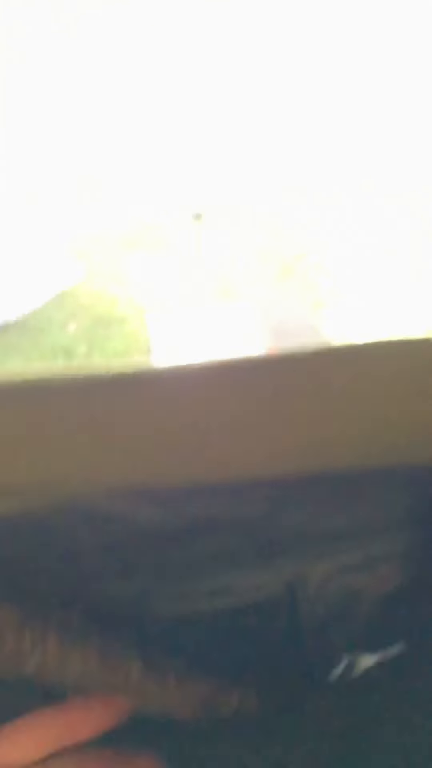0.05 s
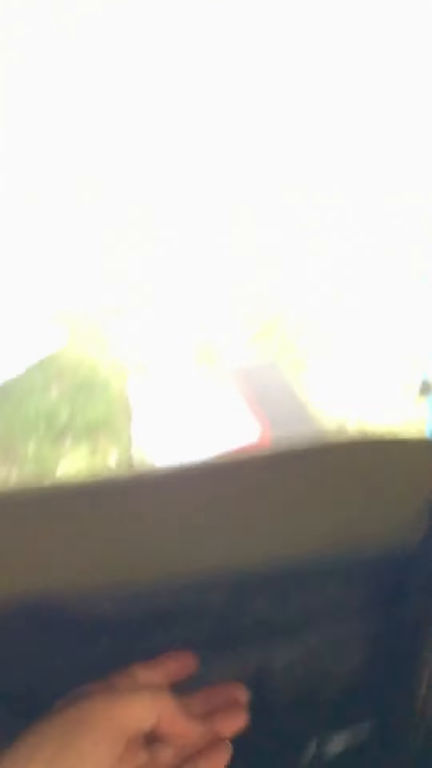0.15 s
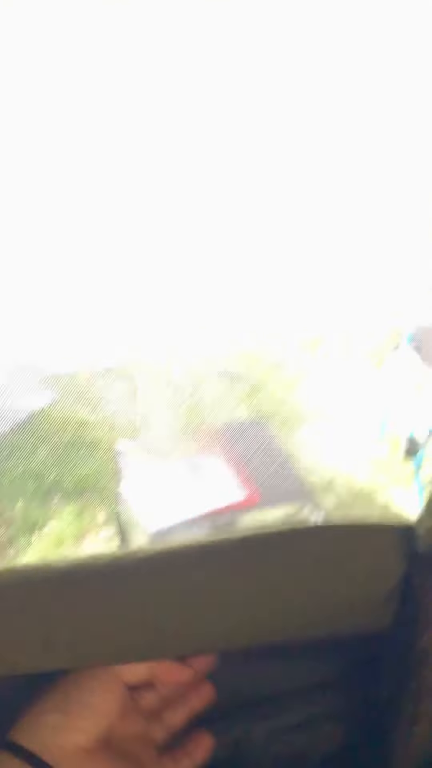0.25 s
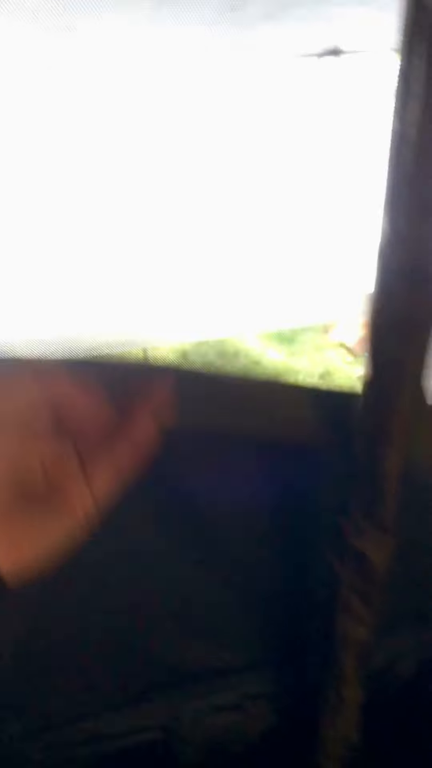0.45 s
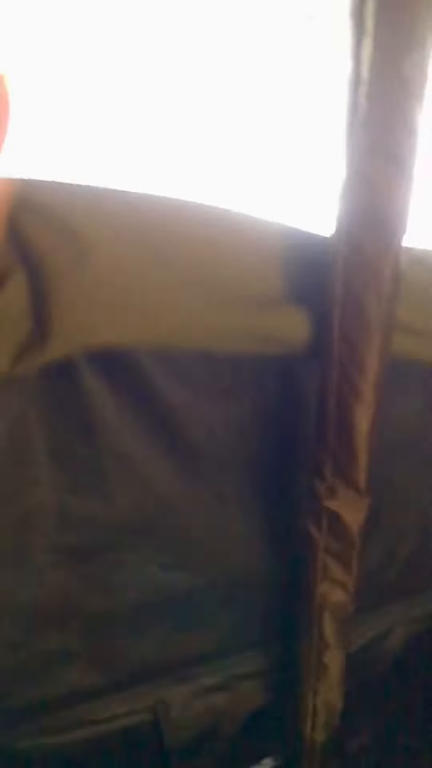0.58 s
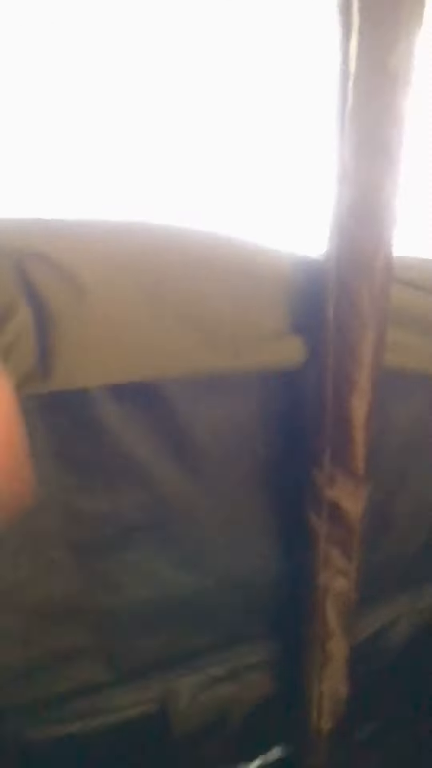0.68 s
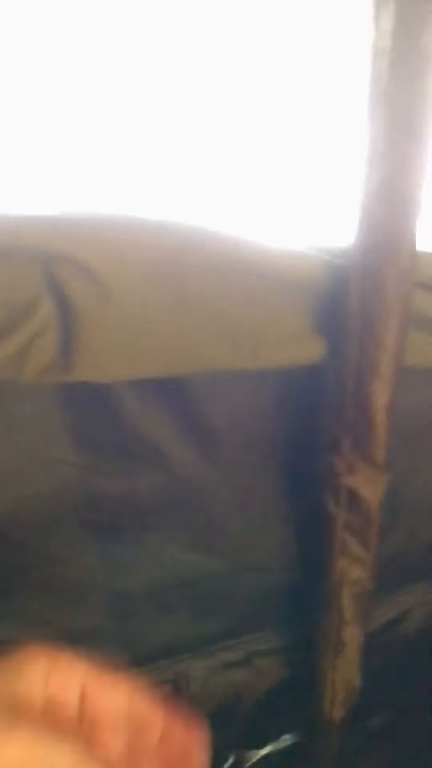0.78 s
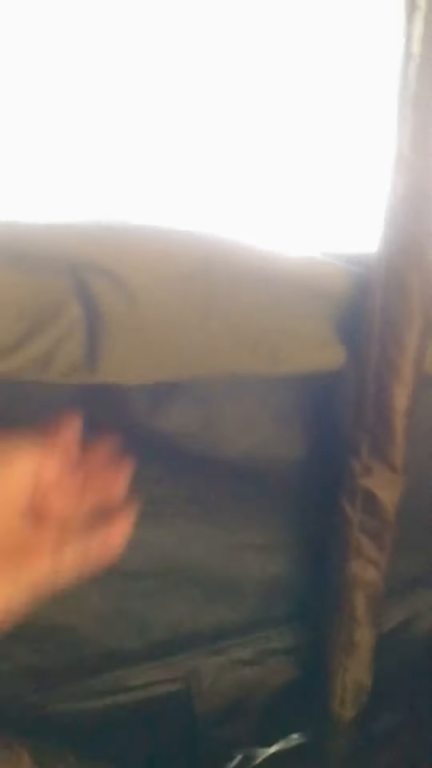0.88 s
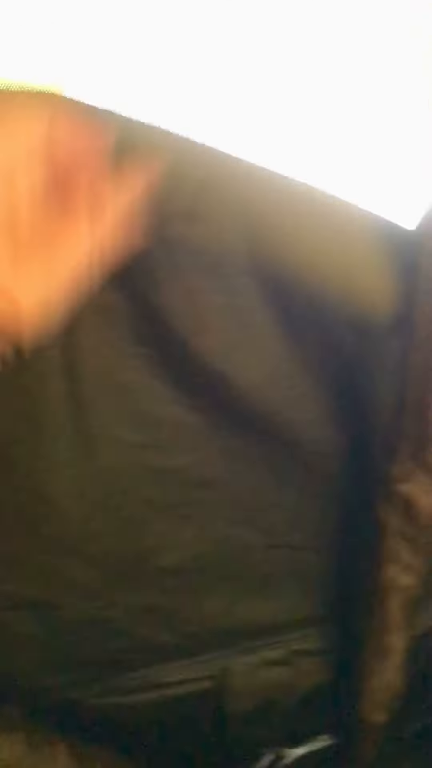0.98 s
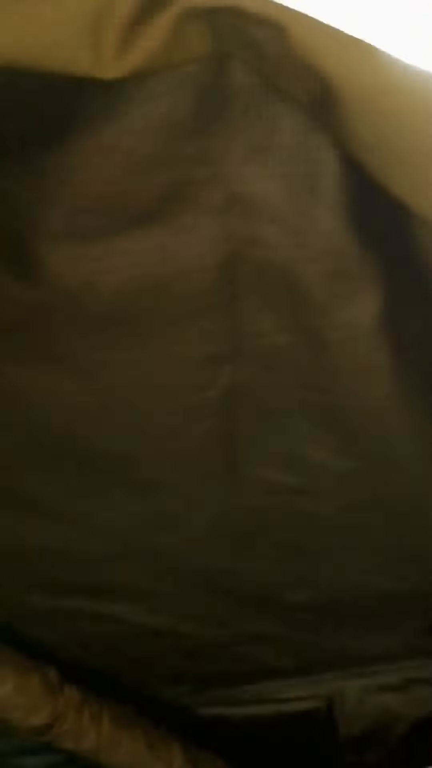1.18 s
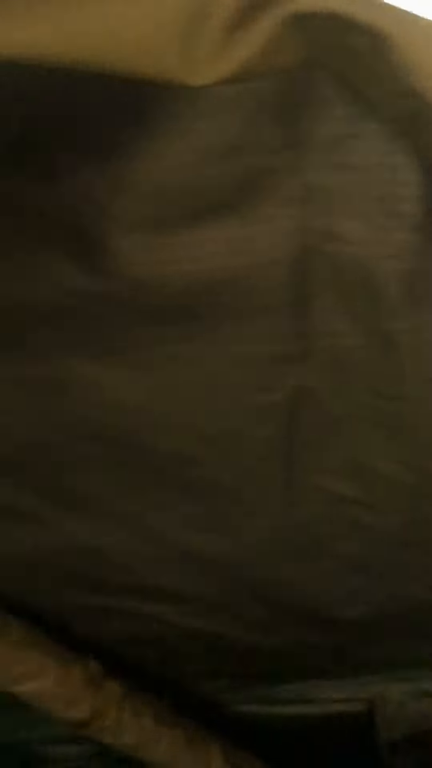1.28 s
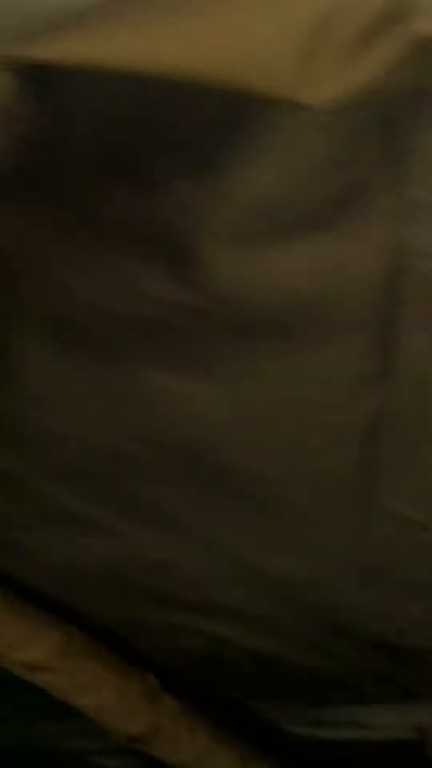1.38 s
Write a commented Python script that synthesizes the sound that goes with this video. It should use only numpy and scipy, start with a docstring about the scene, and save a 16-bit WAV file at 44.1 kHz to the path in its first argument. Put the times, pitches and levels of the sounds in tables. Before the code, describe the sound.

A zipper closes a tent window in two quick pulls, with rustling fabric.

```python
"""A bright, close zip in two quick pulls: a tent window is being shut.
Fine coil teeth run together into a hiss while the slider catches, ticks and at the end squeaks faintly.
The cloth rustles, crumples and snaps taut; the wall sways and flaps like a slack drum.
Ticks and snaps reflect briefly off the tent walls, and faint outdoor air lies under it all."""
import sys
import numpy as np
from scipy import signal
from scipy.io import wavfile
from scipy.ndimage import uniform_filter1d

SR = 44100
rng = np.random.default_rng(int(sys.argv[2]) if len(sys.argv) > 2 else 0)


def generate_wav(sig):
    """Save sig (samples, or channels by samples) to the path in sys.argv[1] as 16-bit PCM at SR."""
    pcm = np.round(np.clip(np.atleast_2d(sig).T, -1, 1) * 32767).astype(np.int16)
    wavfile.write(sys.argv[1], SR, pcm)


N = 63945
TIME = np.arange(N) / SR

# the two pulls (time [s], relative hiss level [dB], treble lift [dB], relative rustle level [dB])
PULL_LEVELS = [(0.085,-64.5,0,-62.5),(0.118,-41.5,-2.5,-45),(0.155,-36.5,0,-53.5),(0.195,-39.5,-7,-40),(0.235,-29.5,-1.5,-41.5),(0.30,-30.5,-1,-36),(0.355,-29,4.5,-31),(0.372,-25.5,4,-28),(0.39,-27.5,2,-34.5),(0.405,-26,2,-27),(0.435,-28.5,-11,-35),(0.468,-44,-0.5,-45),(0.55,-45,-2,-49),(0.61,-46.5,2,-48),(0.67,-54.5,-2,-51),(0.715,-63.5,2,-57),(0.747,-63,3,-58.5),
               (0.752,-41.5,7,-59),(0.775,-32,4.5,-43.5),(0.81,-27,0.5,-43),(0.865,-29,0,-34),(0.895,-24.5,-3.5,-29),(0.92,-26,-7.5,-30.5),(0.945,-31,1,-35),(0.985,-31.5,2,-41.5),(1.008,-28.5,1.5,-40),(1.02,-38.5,-1,-48),(1.085,-40,-2.5,-47.5),(1.15,-48.5,-0.5,-53),(1.23,-54,2,-56.5),(1.30,-58.5,-2,-54.5),(1.35,-56,-2,-59),(1.37,-53.5,-3,-50),(1.397,-44,1,-51),(1.42,-49,1,-54.5),(1.45,-52,-1,-58)]
# tone of the slider on its tape (frequency [Hz], gain [dB])
HISS_EQ = [(300,-25.5),(1200,-15),(2500,-7),(3800,-6.5),(4900,-4),(5900,-2),(7500,-6.5),(9400,-2.5),(10800,-1.5),(12200,1.7),(14000,2),(15800,-2)]
# the slider catches (time [s], level before the low cut [dB], decay [s], low cut [Hz])
SLIDER_CATCHES = [(0.095,-35,0.00045,3000),(0.367,-22,0.00036,8000),(0.379,-13,.0008,10000),(0.3824,-11,.0005,10000),(0.3969,-18,.0007,7100),(0.406,-12,0.00046,8000),(0.4159,-3,0.00068,11300),(0.4248,-13.5,0.003,6150),(0.4284,-5.5,0.0011,7900),(0.4301,-2.5,0.001,6240),(0.9661,-16,0.0034,5170),(0.9694,-9.5,0.00052,4400),(1.013,-20,0.0012,3000),(1.355,-38,0.0015,2500)]
# the slider squeaks (time [s], length [s], level [dB])
SLIDER_SQUEAKS = [(1.372,0.032,-40),(1.427,0.026,-49)]
# modes that ring in a squeak (frequency [Hz], gain [dB])
SLIDER_MODES = [(5200,-11),(8683,-13),(12102,0.5)]
# the cloth snaps taut (time [s], finished snap's rms over 10 ms [dB], pitch [Hz], Q, crackle decay [s])
CLOTH_SNAPS = [(0.161,-47,816,1.9,0.0027),(0.326,-29.5,566,0.46,0.00076),(0.396,-31,810,1.5,0.0058),(0.4315,-28.5,980,1.8,0.0047),(0.4311,-28,2360,7.9,0.0014),(0.4887,-51,700,.8,0.0022),(0.5886,-39.5,970,2,0.0047),(0.7493,-43,644,0.75,0.001),(0.7535,-36.5,694,0.5,0.0046),(0.8349,-36,540,0.69,0.0054),(0.882,-21.5,1110,0.97,0.0023),(0.887,-34,1190,1.5,0.0023),(0.895,-37.5,1530,3.5,0.0024),(0.8965,-22.5,1160,2,0.0079),(0.9692,-31.5,2480,1.2,0.0035),(1.013,-36,920,1.5,0.0019),(1.0117,-33.5,2400,1.2,0.0015),(1.355,-52,1430,0.85,0.0026),(1.362,-49.5,1740,5.2,0.0058),(1.376,-54,1110,0.62,0.0048)]
# tone of a snap (frequency [Hz], gain [dB])
SNAP_EQ = [(60,-4),(250,7.5),(450,-2),(800,5),(1300,3.5),(2000,-3),(3500,-4.5),(7000,-2),(16000,-44)]
# tone of the rustling fabric (frequency [Hz], gain [dB])
RUSTLE_EQ = [(100,-6),(200,-7),(330,-18.5),(550,-9.5),(850,-1),(1200,-1.5),(1700,-3),(2500,-3),(4500,-10),(10000,-15.5)]
# low crumpling of the slack folds (time [s], level [dB])
FOLD_LEVELS = [(0.15,-64.5),(0.27,-56),(0.40,-55),(0.49,-52),(0.53,-55.5),(0.62,-57),(0.72,-71),(0.80,-49.5),(0.88,-54),(1.0,-79.5)]
# tone of the folds (frequency [Hz], gain [dB])
FOLD_EQ = [(150,-26),(300,-1),(430,-1),(580,-1),(900,-22),(2000,-53)]
# swaying of the wall (time [s], level [dB])
SWAY_LEVELS = [(0.07,-70),(0.115,-49),(0.19,-54),(0.28,-48.5),(0.37,-40),(0.425,-36),(0.47,-43.5),(0.56,-57),(0.74,-59.5),(0.79,-38),(0.85,-38),(0.90,-38),(0.95,-44.5),(1.05,-52),(1.15,-58.5),(1.33,-58.5),(1.385,-45.5),(1.45,-59.5)]
# tone of the sway (frequency [Hz], gain [dB])
SWAY_EQ = [(20,-5.5),(50,1.5),(90,-2),(170,-6),(280,-18),(600,-23.5),(2000,-87)]
# the wall flaps (time [s], strength [dB], resting pitch [Hz], decay [s])
WALL_FLAPS = [(0.097,-37.5,93,0.0067),(0.409,-28,52.6,0.03),(0.432,-35,74,0.031),(0.7565,-12,61,0.0098),(0.832,-31.5,103,0.019),(0.876,-25.5,87.4,0.022),(1.2068,-32.5,85,0.0088),(1.222,-30.5,56.4,0.022)]
# tone of the outdoor air (frequency [Hz], gain [dB])
AIR_EQ = [(20,-12),(80,9.5),(300,3),(600,-5.5),(1500,-4.5),(2200,1.5),(3300,-10.5),(4900,-9),(6000,-10.5),(10000,-4.5),(12500,-2.5),(16000,-6.5)]
# dips in the microphone's response (frequency [Hz], width [Hz], gain [dB])
MIC_NOTCHES = [(4864,550,-6),(10530,330,-5.5)]


def zipper():
    """Teeth mesh unevenly, faster on a harder pull, within the hiss of the slider on its tape."""
    full_teeth_per_s, full_pull_db, db_per_tenfold_speed = 1500, -24.5, 45.5
    teeth_db, hiss_db, treble_hz = -7.5, 2, 10800
    force = level(PULL_LEVELS)
    teeth_per_s = full_teeth_per_s * (force / amp(full_pull_db)) ** (20 / db_per_tenfold_speed)
    teeth_passed = np.cumsum(teeth_per_s * np.exp(.3 * wobble(60))) / SR
    clicks = np.diff(np.floor(teeth_passed), prepend=0)
    clicks *= amp(3.5 * rng.standard_normal(N))  # no two teeth equally loud
    drive = rng.standard_normal(N) + amp(teeth_db) * unit(clicks)
    hiss = patchy(colour(drive, HISS_EQ), depth_db=2, span_hz=1240, span_s=0.056)
    treble = signal.sosfiltfilt(signal.butter(6, treble_hz, "high", fs=SR, output="sos"), hiss)
    treble_gain = level(PULL_LEVELS, column=2)
    return amp(hiss_db) * force * (hiss + (treble_gain - 1) * treble)


def ticks():
    """The slider catches: each snag is a bright, dry clump of tiny slips."""
    out = np.zeros(N)
    for start, db, decay_s, low_cut_hz in SLIDER_CATCHES:
        add(out, start, amp(db) * highpass(burst(decay_s), low_cut_hz, order=4))
    return out


def squeaks():
    """Dragged slowly, the slider sings on its modes in thin, wavering tones."""
    out, waver_hz = np.zeros(N), 45.4
    for start, length, db in SLIDER_SQUEAKS:
        t = np.arange(0, length, 1 / SR)
        swell = np.sin(np.pi * t / length)
        for hz, mode_db in SLIDER_MODES:
            pitch = hz + waver_hz * wobble(130)[:len(t)]
            add(out, start, amp(db + mode_db) * swell * sine(pitch))
    return out


def snaps():
    """Slack cloth is jerked tight: one jolt and a crackle ring a heavily damped patch of fabric."""
    out, crackle_db = np.zeros(N), -16
    for start, db, hz, q, decay_s in CLOTH_SNAPS:
        drive = amp(crackle_db) * burst(decay_s)
        drive[0] += 1  # the jolt
        pop = colour(resonate(drive, hz, q), SNAP_EQ)
        pop *= np.sqrt(.01 * SR) / np.linalg.norm(pop)  # the energy of 10 ms at unit rms
        add(out, start, amp(db) * pop)
    return out


def cloth():
    """Dense crinkles drive the fabric's rustle and its crumpling folds, over the low sway of the wall."""
    crinkles_per_s, rustle_db = 1500, 0.5
    crinkles = rng.standard_normal(N) * (rng.random(N) < crinkles_per_s / SR)
    drive = unit(crinkles) + 1.27 * rng.standard_normal(N)
    rustle = patchy(colour(drive, RUSTLE_EQ), depth_db=2, span_hz=497, span_s=0.03)
    rustle *= amp(rustle_db) * level(PULL_LEVELS, column=3)
    folds = level(FOLD_LEVELS) * unit(colour(crinkles, FOLD_EQ))
    sway = level(SWAY_LEVELS) * unit(colour(rng.standard_normal(N), SWAY_EQ))
    return rustle + folds + sway


def flaps():
    """The wall thumps like a slack drum, its pitch sagging an octave as the tension goes."""
    attack_s, sag_s = 0.0033, 0.0055
    out, t = np.zeros(N), TIME[:SR // 4]
    for start, db, hz, decay_s in WALL_FLAPS:
        pitch = hz * (1 + np.exp(-t / sag_s))
        envelope = np.minimum(t / attack_s, 1) * np.exp(-t / decay_s)
        add(out, start, -amp(db) * envelope * sine(pitch))
    return out


def tent_reflections(x):
    """The cloth walls add a faint, short tail to a sound."""
    wet_db, t60_s, predelay_s = -16.5, 0.12, .002
    t = TIME[:SR // 5]
    tail = rng.standard_normal(len(t)) * amp(-60 * t / t60_s) * (t > predelay_s)
    return x + amp(wet_db) * signal.fftconvolve(x, tail / np.linalg.norm(tail))[:N]


def outdoor_air():
    """A faint, steady bed of air outside the tent."""
    return amp(-57.5) * unit(colour(rng.standard_normal(N), AIR_EQ))


def amp(db):
    """Decibels to gain."""
    return 10 ** (np.asarray(db) / 20)


def unit(x):
    """Scales to an rms of one."""
    return x / np.sqrt(np.mean(x ** 2) + 1e-20)


def add(mix, start, sound):
    """Mixes a sound in at a start time in seconds."""
    part = mix[max(round(start * SR), 0):][:len(sound)]
    part += sound[:len(part)]


def level(table, column=1):
    """A fader ride: gain over time from one dB column of a table."""
    rows = np.array(table)
    return amp(np.interp(TIME, rows[:, 0], rows[:, column], left=-100))


def sine(hz):
    """A tone that follows a pitch curve."""
    return np.sin(2 * np.pi * np.cumsum(hz) / SR)


def wobble(samples):
    """Random drift of unit rms, smoothed over so many samples."""
    return unit(uniform_filter1d(rng.standard_normal(N), samples))


def burst(decay_s):
    """A quickly dying clump of tiny slips."""
    t = TIME[:SR // 10]
    return rng.choice([-1., 1.], len(t)) * np.exp(-t / decay_s)


def highpass(x, hz, order):
    """Cuts the lows."""
    return signal.sosfilt(signal.butter(order, hz, "high", fs=SR, output="sos"), x)


def resonate(x, hz, q):
    """Rings one resonant band."""
    return signal.lfilter(*signal.iirpeak(hz, q, fs=SR), x)


def colour(x, eq):
    """Minimum-phase EQ, so nothing rings ahead of an attack."""
    hz, db = np.transpose(eq)
    size = 4096
    bin_hz = abs(np.fft.fftfreq(size, 1 / SR))
    log_gain = np.log(amp(np.interp(np.log(bin_hz + 1), np.log(hz), db)))
    taps = np.fft.ifft(np.exp(np.conj(signal.hilbert(log_gain)))).real
    return signal.fftconvolve(x, taps[:size // 2])[:len(x)]


def patchy(x, depth_db, span_hz, span_s):
    """Drifting patches of colour that wander slowly over pitch and time; comes out at unit rms."""
    frames = dict(nperseg=256, noverlap=192)
    spectra = signal.stft(x, **frames)[2]
    per_hz = np.fft.fftfreq(spectra.shape[0], SR / 256)[:, None]
    per_s = np.fft.fftfreq(spectra.shape[1], 64 / SR)
    blur = np.exp(-(per_hz * span_hz) ** 2 - (per_s * span_s) ** 2)
    speckle = rng.standard_normal(spectra.shape)
    patches = unit(np.fft.ifft2(np.fft.fft2(speckle) * blur).real)
    return unit(signal.istft(spectra * amp(depth_db * patches), **frames)[1][:N])


def scene():
    """Zipper and cloth inside the tent, over faint outdoor air, in mono."""
    air = outdoor_air()
    return (zipper() + cloth() + tent_reflections(ticks() + snaps()) + squeaks() + flaps() + air)[None]


def record(dry):
    """Microphone colour, rumble filter and band limit."""
    low_cut_hz, high_cut_hz = 28, 15950
    for hz, width_hz, db in MIC_NOTCHES:
        dry = dry + (amp(db) - 1) * resonate(dry, hz, q=hz / width_hz)
    dry = highpass(dry, low_cut_hz, order=2)
    lowpass = signal.firwin(401, high_cut_hz, window=("kaiser", 8), fs=SR)
    return signal.oaconvolve(dry, lowpass[None], "same")


dry = scene()
out = record(dry)
generate_wav(out)
```